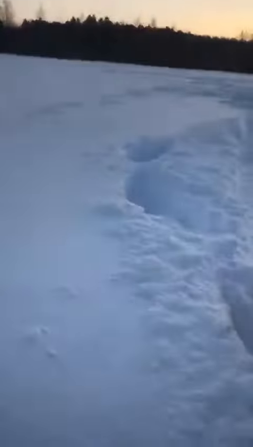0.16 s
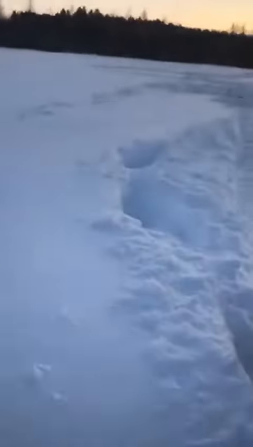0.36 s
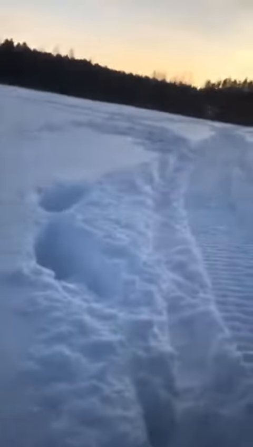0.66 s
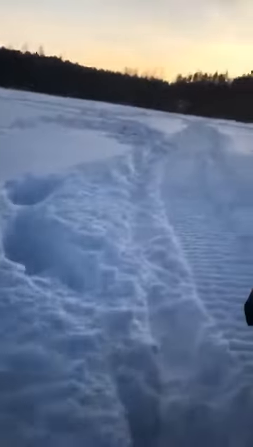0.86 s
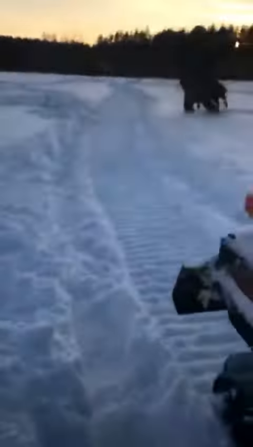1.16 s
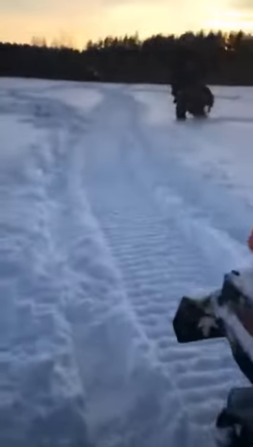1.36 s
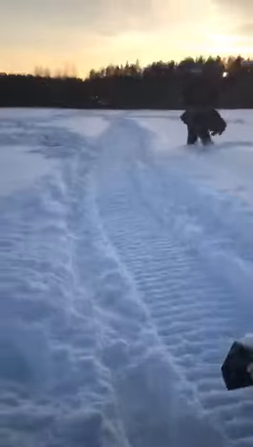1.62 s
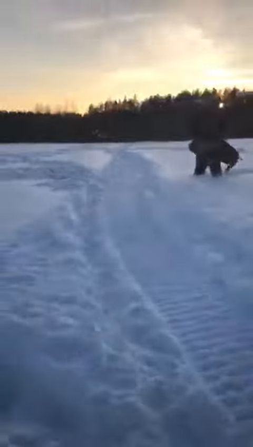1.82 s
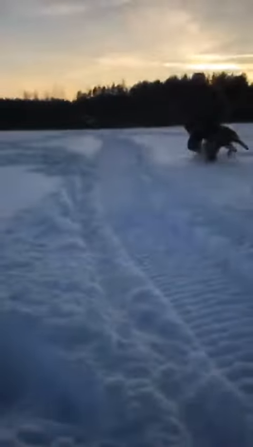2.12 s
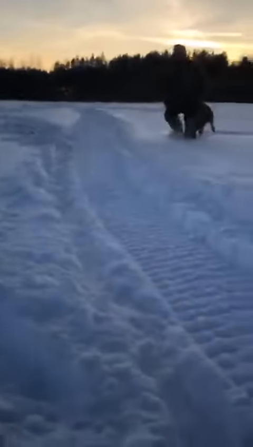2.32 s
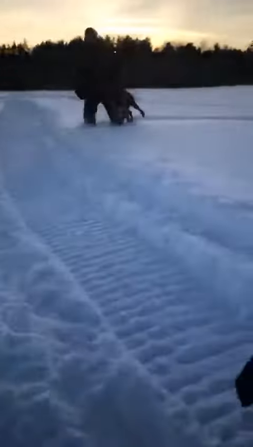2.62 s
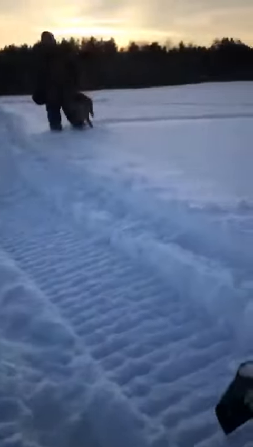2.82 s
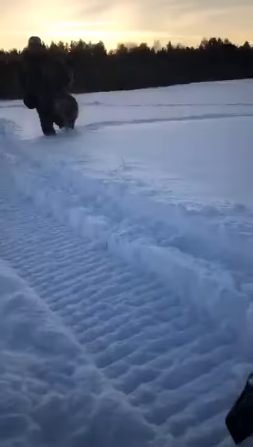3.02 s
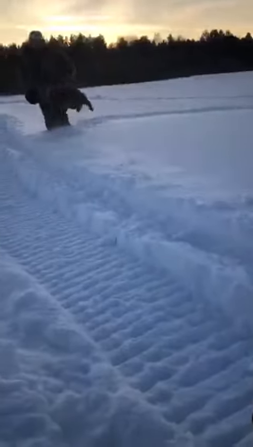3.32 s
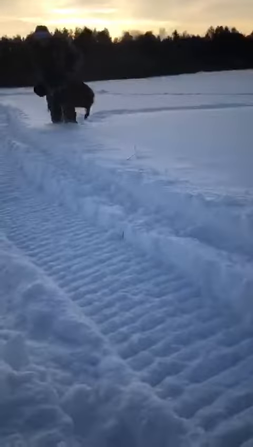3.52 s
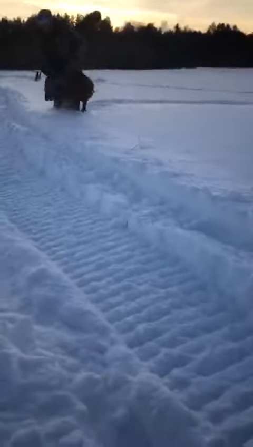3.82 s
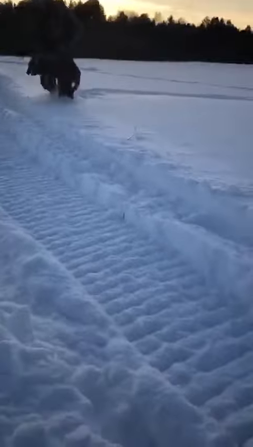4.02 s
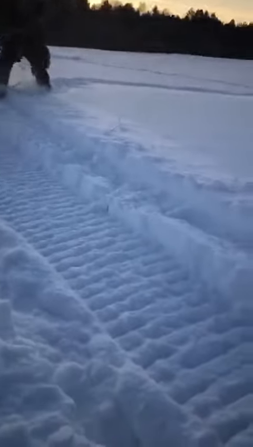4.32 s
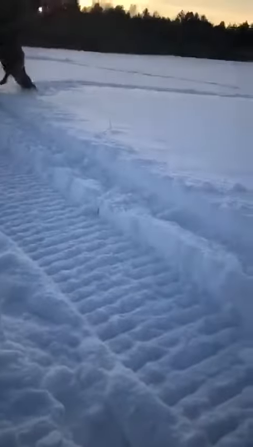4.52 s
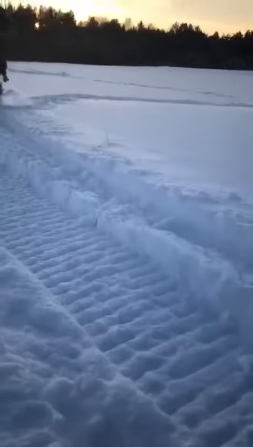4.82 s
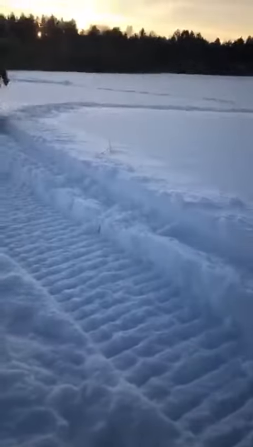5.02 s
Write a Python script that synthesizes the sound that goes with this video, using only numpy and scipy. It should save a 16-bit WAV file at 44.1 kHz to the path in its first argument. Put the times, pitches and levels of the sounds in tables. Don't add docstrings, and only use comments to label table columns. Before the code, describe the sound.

A captured boar squeals loudly a few paces from the microphone in an open snowy field. The first cry is already sounding; three more follow after very short breaks, with throaty creaks before each new one and the last cut off. A small engine idles low nearby, wind pops softly on the microphone, and a distant tree line returns a barely audible echo.

```python
import sys
import numpy as np
from scipy import signal
from scipy.io import wavfile
from scipy.ndimage import uniform_filter1d

SR = 44100
rng = np.random.default_rng(int(sys.argv[2]) if len(sys.argv) > 2 else 0)


def linear_from_db(decibels):
    return 10 ** (np.asarray(decibels, float) / 20)


def to_wav(s):
    ch = np.atleast_2d(s).T
    pcm = np.round(np.clip(ch, -1, 1) * 32767)
    wavfile.write(sys.argv[1], SR, pcm.astype(np.int16))


N = 227776

# frequency in Hz, density in dB per Hz.
AIR_COLOUR = [(15, -48), (25, -29), (101, -2), (174, -62), (475, -7.5), (700, -23), (839, -20.5),
              (1030, -22.5), (1870, -28.5), (4380, -33.5), (5530, -32), (10800, -43.5), (12000, -68),
              (15600, -112), (22000, -120)]
AIR_DB = -44

# multiple of the firing rate, level in dB.
ENGINE_ORDERS = [(1, -47), (2, -2.5), (3, 0.5), (4, -11.5), (5, -19), (6, -16.5), (7, -15), (8, -11.5),
                 (9, -10.5), (10, -17), (11, -35), (12, -25)]
# frequency in Hz, density in dB per Hz.
EXHAUST_COLOUR = [(20, -17), (40, 10.0), (90, 4.5), (280, -1.0), (500, -8.5), (800, -34)]
# time in seconds, level in dB.
IDLE_LEVEL = [(0, -29), (.4, -32), (.75, -30.5), (1.3, -33.5), (1.65, -38), (1.9, -33), (2.3, -38.5),
              (3.0, -39.5), (3.898, -38.5), (4.5, -44.5), (5.16, -42)]
IDLE_HZ, HUNT_HZ = 32.07, 0.26
STEP = 8

# start in seconds, peak in dB, frequency in Hz.
POPS = [(0.145, -19, 266), (0.206, -26, 140), (0.67, -24, 206), (1.246, -19, 147), (1.705, -31, 281),
        (2.13, -18.5, 208), (2.251, -16.5, 199), (2.444, -21.5, 185), (2.544, -21, 143), (2.62, -25, 224.8),
        (2.805, -21, 252.3), (2.843, -26, 162), (2.894, -25, 170), (3.013, -30, 249.4), (3.235, -16.5, 151),
        (3.471, -30, 186)]
# start in seconds, end in seconds, peak in dB, middle in Hz.
GUSTS = [
    (3.309, 3.35, -17.5, 245),
    (3.928, 3.995, -19, 184),
    (4.043, 4.058, -12, 273.6),
    (4.122, 4.15, -16.5, 218),
    (4.157, 4.19, -12, 259),
]
GUST_GAP_S = .01

# start in seconds, peak in dB, air tick in dB.
CREAKS = [
    (1.583, -15.5, -30),
    (3.091, -9.5, -20),
    (3.108, -9, -17),
    (3.122, -6, -26),
    (3.13, -32, -26),
    (4.928, -15, -35),
    (4.947, -11, -25),
    (4.962, -8.5, -25),
    (4.979, -12, -23),
    (4.991, -17, -24),
]
# frequency in Hz, level in dB, 60 dB decay in seconds.
THROAT = [(709, -0.5, 0.047), (1240, -6, 0.034), (2110, 5, 0.024), (2650, -1, 0.023), (4270, -4, .01)]

# multiple of the whistle, level in dB.
PARTIALS = [(0.25, -36.5), (0.5, -9), (0.75, -20), (1, 0), (1.25, -6), (1.5, -18), (1.75, -27), (2, -9),
            (2.25, -15), (2.5, -19.5), (2.75, -21.5), (3, -17), (3.25, -17.5), (3.5, -25), (3.75, -21),
            (4, -22.5), (4.25, -24.5), (4.5, -90), (4.75, -29), (5, -23), (5.25, -30), (5.5, -27),
            (5.75, -65), (6, -43), (6.25, -31)]
# frequency in Hz, density in dB per Hz.
BREATH_COLOUR = [(450, -65), (900, -7.5), (1300, -18), (1900, -7.5), (2500, 0), (3250, -13.5), (4100, -11),
                 (5600, -13.5), (7600, -13), (8800, -15), (10300, -17), (11200, -16), (12000, -72)]
# time in seconds, whistle in Hz, effort in dB, focus on the whistle in dB, air leak in dB.
FIRST_CRY = [(0, 1920, -18, 0, -7.5), (0.191, 1888, -20, 1, 1), (.31, 1917, -21, -4, 6),
             (.4, 1873, -18, 0, 1), (.66, 1865, -13, 0, -2.5), (.75, 1869, -13, -2.5, -1),
             (0.869, 1893, -11, 2, -0.5), (.96, 1891, -13.5, 0, 0), (1.325, 1876, -11, 4.5, 1.5)]
SECOND_CRY = [(1.58, 1878, -16, -4, -14), (1.69, 1896, -18, -1, 3), (1.808, 1886, -9.5, 1.5, 0),
              (1.845, 1792, -13.5, 3, 1.5), (1.94, 1876, -13, -3.5, -1), (2.131, 1866, -12, 2.5, 1.5),
              (2.21, 1857, -17, 4, 5), (2.38, 1843, -17.5, 0.5, 5), (2.678, 1847, -9.5, 1.5, -1)]
THIRD_CRY = [(3.124, 1629, -17, -1, -1.5), (3.35, 1805, -11.5, 1, 1), (3.47, 2014, -13.5, -1, -5.5),
             (3.545, 1932, -7.5, -0.5, -3), (3.84, 1894, -14, -2, 3), (4.02, 1973, -10, -1, -2.5),
             (4.145, 1955, -13, -3, 1.5), (4.365, 2001, -11.5, -2.5, -3), (4.636, 1965, -8, 1.5, -4)]
FOURTH_CRY = [(4.991, 1984, -17.5, -2, -8.5), (5.042, 1927, -19.5, -11, 4.5), (5.053, 2005, -15, -4, -5),
              (5.09, 2064, -13, -5.5, -4), (5.16, 2058, -10, 0, -6)]
# scoop in seconds, scoop depth from 0 to 1, attack in dB, release in seconds.
EDGES = [
    (0.00092, .001, 4, 0.044),
    (.105, .34, -17, 0.068),
    (.055, .32, -3.5, 0.056),
    (.046, .42, -4.5, 0.07),
]
# flutter rate minus a quarter of the whistle in Hz, growl in dB,
# octave in dB, wait before the flutter catches in seconds.
VOICES = [
    (-1, -4.5, -4.5, -.01),
    (-3, 3, 0, -.01),
    (14, 3, 0.5, -.01),
    (-35, -4, -1, 0.058),
]
CALM = [.35, .3, .52, .2]
# start in seconds, end in seconds, disorder in radians.
CRACKS = [(.15, .32, .6), (1.578, 1.645, 1.6), (1.82, 1.87, 1.8), (1.97, 2.07, .8), (3.122, 3.17, 1.9),
          (3.2, 3.36, 1.15), (3.55, 3.72, .9), (4.3, 4.58, .85), (5.08, 5.2, .45)]
CRACK_S = .045

WHISTLE_DB, SIDE_DB, RASP_DB, OCTAVE_DB, GROWL_DB = -1.5, -9, -7, -16, -27
SIDE_TRADE, OCTAVE_LEAK, GROWL_PER_RAD_DB = .7, .8, 1
ATTACK_S, SCOOP_CURVE, SCOOP_GROWL_DB, SCOOP_SIDE_DB, SCOOP_WHISTLE_DB = 0.023, 1.2, 8.5, -5.5, -6.5
SAG, SAG_CURVE, CUT_DB, CUT_CURVE = .26, 1.45, -55.5, 2.28
FALL_OCTAVE_DB, FALL_WHISTLE_DB, FALL_RASP_DB, FALL_RAD = 14, -8.5, 0.5, .85
LOCK_S, UNLOCKED_DB, PURE_DB = .004, -14, 6
SLIP_WANDER_HZ = 9
UNDER_DB = -3
WAVER_DB = 2.2

# time in seconds, half length in seconds, frequency in Hz, relative depth in dB.
MOUTH_DIPS = [(0.649, 0.19, 6400, 4), (0.983, 0.2, 4460, 5.5), (1.705, 0.04, 4640, 12),
              (1.983, 0.033, 4420, 5), (2.317, 0.072, 8973, 23), (.25, 0.11, 4340, 6.5),
              (1.2, .1, 4170, 2.5), (1.851, 0.067, 4247, -3), (3.178, 0.032, 3930, -4.5),
              (1.861, .015, 990, -5), (1.826, .04, 2630, 1.5), (3.44, 0.047, 5246, -2),
              (3.562, 0.13, 3130, 4.5), (4.149, 0.17, 3200, 3.5), (4.458, .05, 4592, 3),
              (4.635, 0.082, 4920, 4), (5.106, 0.094, 7300, 9)]
# time in seconds, treble in dB.
SNOUT = [(0, 10.5), (.25, -6.5), (.6, 6), (1.0, -2), (1.2, -6), (1.4, -6.5), (1.72, 0), (1.97, 2.5),
         (2.3, -5.5), (2.55, 1), (3.15, -6.5), (3.4, 2.5), (4.2, -2.5), (4.5, -1.5), (5.16, 5.5)]

# time in seconds, middle in Hz.
TREBLE_SPREADS = [(.245, 5000), (.245, 6950), (.5, 5750), (.5, 7600), (.9, 9700), (1.545, 5150),
                  (1.545, 8950), (1.755, 9350), (2.105, 4650), (2.475, 9700), (3.45, 6300), (3.45, 9700),
                  (3.54, 10300), (4.195, 9700)]
EDGE_HZ = 11900


def evened(x):
    return x / np.sqrt(np.mean(abs(x) ** 2) + 1e-20)


def add(mix, s, sound):
    part = mix[round(s * SR):][:len(sound)]
    part += sound[:len(part)]


def drift(count, hz):
    knots = rng.standard_normal(count // 16 + 3000)
    smooth = signal.sosfilt(signal.butter(2, hz, fs=SR / 16, output="sos"), knots)
    return np.interp(np.arange(count) / 16 + 1000, np.arange(len(knots)), evened(smooth))


def patchwork(x, rows, columns):
    return evened(uniform_filter1d(uniform_filter1d(x, size=rows, axis=0), size=columns, axis=1))


def noise(count, colour, patchy_db):
    frames, hz = count // 256 + 5, np.fft.rfftfreq(1024, 1 / SR)
    a, b, patches = rng.standard_normal((frames, 513, 3)).T
    f, db = np.transpose(colour)
    colour_db = np.interp(np.log(hz + 1), np.log(f + 1), db)[:, None]
    spectra = (a + 1j * b) * linear_from_db(colour_db + patchy_db * patchwork(patches, 14, 24))
    return evened(signal.istft(spectra, nperseg=1024, noverlap=768)[1][:count])


def open_air():
    return linear_from_db(AIR_DB) * noise(N, AIR_COLOUR, patchy_db=2.0)


def tree_line(x):
    t = np.arange(SR) / SR
    scatter = rng.standard_normal(SR) * (rng.random(SR) < .05)
    tail = scatter * linear_from_db(-60 * t / 5.1) * np.clip(t / 0.33, 0, 1)
    return signal.fftconvolve(x, tail / np.linalg.norm(tail))[:N]


def engine():
    level_db = np.interp(np.arange(N) / SR, *np.transpose(IDLE_LEVEL))
    turn = 2 * np.pi * np.cumsum(IDLE_HZ + HUNT_HZ * drift(N, hz=2.07)) / SR
    orders = 0
    for k, db in ENGINE_ORDERS:
        size = linear_from_db(db + 3.54 * drift(N, hz=10.7)[::STEP])
        uneven_turn = (turn + 0.11 * drift(N, hz=10.5))[::STEP]
        orders = orders + size * np.cos(k * uneven_turn + 2 * np.pi * rng.random())
    orders = np.interp(np.arange(N) / STEP, np.arange(len(orders)), orders)
    puffs = noise(N, EXHAUST_COLOUR, patchy_db=2.0) * (1 + .5 * np.cos(turn))
    return linear_from_db(level_db) * (1.35 * evened(orders) + 0.61 * puffs)


def pop(db, hz):
    u = np.arange(-1.2, 2.2, hz / SR)
    a, b = rng.random(2)
    pressure = np.cos(2 * np.pi * (u + a)) + 0.38 * np.cos(2 * np.pi * (2.27 * u + b))
    return linear_from_db(db) * np.exp(-(u / 0.49) ** 2) * pressure


def wind():
    out = np.zeros(N)
    for s, db, hz in POPS:
        add(out, s, pop(db, hz))
    for start, end, db, hz in GUSTS:
        for s, (a, b, c) in zip(np.arange(start, end, GUST_GAP_S), rng.uniform(-1, 1, (8, 3))):
            add(out, s + 0.88 * c * GUST_GAP_S, pop(db - 1.5 + 4.0 * a, hz * (1 + .4 * b)))
    return out


def creak(db, edge_db):
    t = np.arange(2500) / SR
    ring = 0
    for hz, d, t60 in THROAT:
        ring = ring + linear_from_db(d - 60 * t / t60) * np.sin(2 * np.pi * hz * rng.uniform(0.85, 1.14) * t)
    tick = linear_from_db(edge_db - 60 * t / 0.026) * rng.standard_normal(len(t))
    return linear_from_db(db) * (ring / abs(ring).max() + tick) * np.minimum(t / 0.00067, 1)


def disorder(t, calm):
    cracks = [rad * np.clip(1 + np.minimum(t - a, b - t) / CRACK_S, 0, 1) for a, b, rad in CRACKS]
    return np.maximum(calm, np.max(cracks, axis=0))


def layers(rows, edges, voice, calm):
    s, *columns = np.transpose(rows)
    scoop_s, depth, attack_db, release_s = edges
    growl_db, octave_db, wait_s = voice[1:]
    t = np.arange(s[0], s[-1] + release_s, 1 / SR)
    hz, effort_db, focus_db, leak_db = (np.interp(t, s, c) for c in columns)
    slack = np.clip(1 - (t - s[0]) / scoop_s, 0, 1) ** SCOOP_CURVE
    out = np.clip((t - s[-1]) / release_s, 0, 1)
    falling = np.minimum(2 * out, 1)
    pure = np.clip((s[0] + wait_s - t) / LOCK_S, 0, 1)
    hoarse = disorder(t, calm) + FALL_RAD * falling
    attack = np.clip(1 - (t - s[0]) / ATTACK_S, 0, 1)
    level_db = effort_db + attack_db * attack + CUT_DB * out ** CUT_CURVE
    hz = hz * (1 - depth * slack) * (1 - SAG * (1 - (1 - out) ** SAG_CURVE))
    whistle_db = WHISTLE_DB + focus_db + FALL_WHISTLE_DB * falling + SCOOP_WHISTLE_DB * slack * hoarse
    octave_db = OCTAVE_DB + octave_db + OCTAVE_LEAK * leak_db + FALL_OCTAVE_DB * falling
    side_db = SIDE_DB - SIDE_TRADE * focus_db + SCOOP_SIDE_DB * slack * hoarse
    rasp_db = RASP_DB + leak_db + FALL_RASP_DB * falling
    growl_db = GROWL_DB + growl_db + (GROWL_PER_RAD_DB + SCOOP_GROWL_DB * slack) * hoarse
    return (hz, hoarse, pure, level_db + whistle_db, level_db + octave_db,
            level_db + side_db, level_db + rasp_db, level_db + growl_db)


def cry(rows, edges, own, calm):
    hz, hoarse, pure, whistle_db, octave_db, side_db, rasp_db, growl_db = layers(rows, edges, own, calm)
    n, levels = len(hz), dict(PARTIALS)
    side_db = side_db + WAVER_DB * drift(n, hz=12)
    tremble = 1 + 0.00768 * drift(n, hz=33.55) + 0.0078 * hoarse * drift(n, hz=66.4)
    whistle = 2 * np.pi * np.cumsum(hz * tremble) / SR + 0.15 * hoarse ** 2 * drift(n, hz=358)
    slip = 2 * np.pi * np.cumsum(own[0] + SLIP_WANDER_HZ * drift(n, hz=2.976)) / SR
    flutter = whistle / 4 + slip + hoarse * (0.69 * drift(n, hz=39.0) + 0.35 * drift(n, hz=316))
    doubling = 1 + .33 * np.cos(flutter / 2)
    voice, unlocked, whole = np.zeros(n), linear_from_db(UNLOCKED_DB * pure), linear_from_db(PURE_DB * pure)
    for multiple, db in PARTIALS:
        m = int(multiple + .4)
        beats = round(4 * (multiple - m))
        if multiple < .6:
            size = linear_from_db(growl_db + db - levels[.5])
        elif multiple < .9:
            size = linear_from_db((side_db + whistle_db) / 2 + UNDER_DB + db - levels[1.25]) * doubling
        elif multiple < 1.9:
            size = linear_from_db(side_db + db - levels[1.25]) * doubling if beats else linear_from_db(whistle_db)
        elif beats or m > 2:
            size = linear_from_db(rasp_db + db + 2.0 + 3.27 * drift(n, hz=7.0)) * doubling
        else:
            size = linear_from_db(octave_db + db - levels[2])
        if beats:
            size = size * unlocked
        elif m > 1:
            size = size * whole
        shimmer = 1 + (.15 if multiple < 1.9 else .45) * hoarse * drift(n, hz=130)
        in_band = np.clip((EDGE_HZ - multiple * hz) / 300, 0, 1)
        tone = np.cos(m * whistle + beats * flutter + 2 * np.pi * rng.random())
        voice += np.sqrt(2) * size * shimmer * in_band * tone
    chopping = evened(1 + 0.2 * np.cos(flutter) + 0.053 * drift(n, hz=116))
    breath = noise(n, BREATH_COLOUR, patchy_db=5.0) * chopping
    low = signal.sosfiltfilt(signal.butter(4, 3300, fs=SR, output="sos"), breath)
    voice += linear_from_db(rasp_db - 5.0) * evened(breath - low) * (0.53 + 0.42 * hoarse)
    throat = linear_from_db(side_db - 6) + linear_from_db(rasp_db - 12) * hoarse ** 2
    voice += throat * np.sqrt(unlocked) * evened(low)
    return rows[0][0], voice * signal.windows.tukey(n, .006)


def mouth(x):
    hz, t, z = signal.stft(x, SR, nperseg=1024)
    hz = hz[:, None]
    dips_db = 0
    for s, half, f, db in MOUTH_DIPS:
        dips_db = dips_db + db * np.exp(-((hz - f) / 230) ** 2 - ((t - s) / half) ** 2)
    snout_db = np.interp(t, *np.transpose(SNOUT)) * np.clip((hz - 7600) / 1500, 0, 1)
    patches = patchwork(rng.standard_normal(z.shape), 16, 8)
    glint_db = 3 * patches * np.clip((hz - 2800) / 5000, 0, 1)
    gain_db = snout_db + glint_db - (3.68 + 0.22 * patches) * dips_db
    return signal.istft(z * linear_from_db(gain_db), SR, nperseg=1024)[1][:N]


def boar():
    cries = np.zeros(N)
    for row in zip((FIRST_CRY, SECOND_CRY, THIRD_CRY, FOURTH_CRY), EDGES, VOICES, CALM):
        add(cries, *cry(*row))
    out = mouth(cries)
    for s, db, edge_db in CREAKS:
        add(out, s, creak(db, edge_db))
    return out


def scene():
    animal = boar()
    mono = animal + linear_from_db(-47) * tree_line(animal) + engine() + wind() + open_air()
    return np.array([mono, mono])


def thin_treble(x):
    hz, t, z = signal.stft(x, SR, nperseg=1024)
    power = uniform_filter1d(abs(z) ** 2, size=2, axis=1)
    band_db = 10 * np.log10(abs(uniform_filter1d(power, size=5, axis=0)) + 1e-14)
    around_db = uniform_filter1d(band_db, size=50, axis=0)
    weak = band_db < around_db - 9 + hz[:, None] / 3500
    silent = weak & (hz[:, None] > 3000) & (around_db > -72)
    stray = sum(np.outer(abs(hz - f) < 750, abs(t - s) < .015) for s, f in TREBLE_SPREADS)
    mid = signal.istft(z * ~silent, SR, nperseg=1024)[1][:N]
    side = linear_from_db(-4) * signal.istft(1j * z * stray, SR, nperseg=1024)[1][:N]
    return np.array([mid + side, mid - side])


def top_cut(x):
    return signal.sosfilt(signal.butter(12, 12280, fs=SR, output="sos"), x)


def record(dry):
    soft = .97 * np.tanh(dry[0] / .97)
    band_limit = signal.firwin(511, EDGE_HZ, window=("kaiser", 9), fs=SR)
    limited = signal.oaconvolve(soft, band_limit, "same")
    return top_cut(thin_treble(limited))


dry = scene()
out = record(dry)
to_wav(out)
```